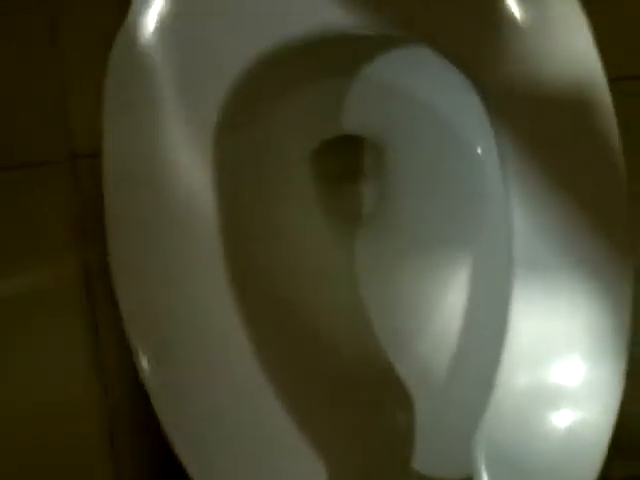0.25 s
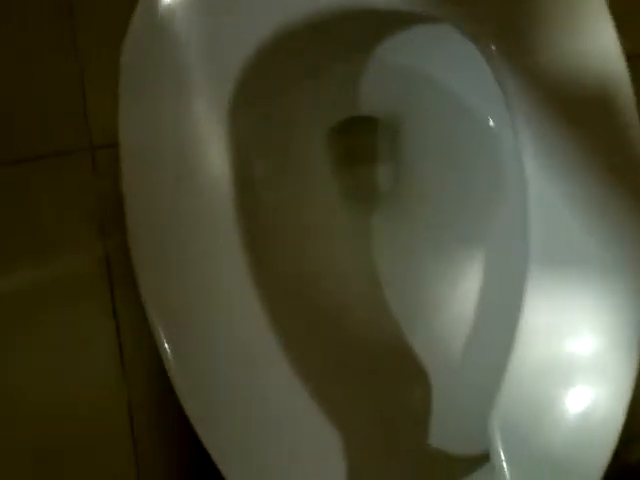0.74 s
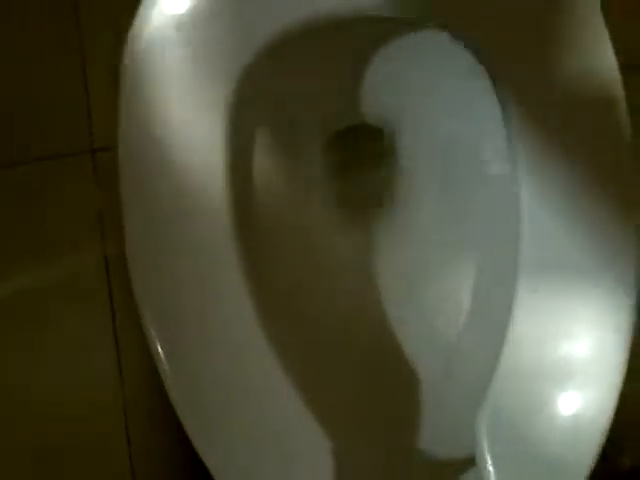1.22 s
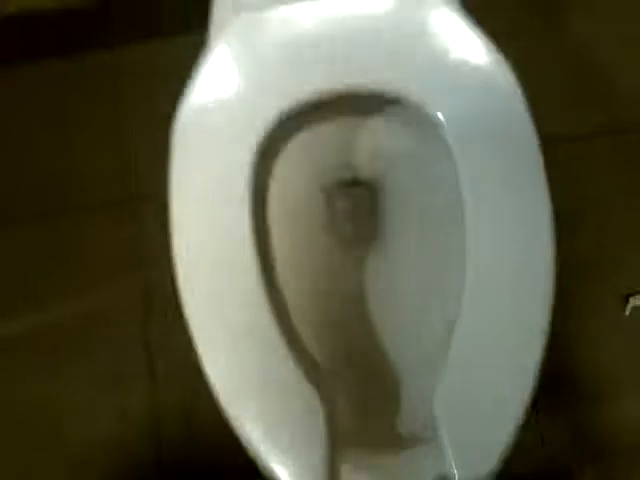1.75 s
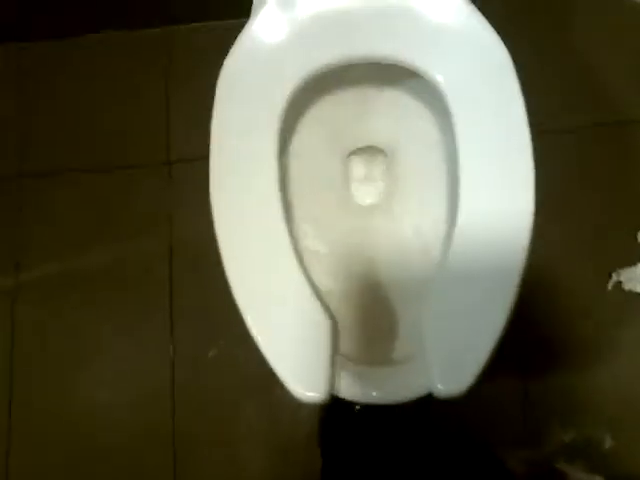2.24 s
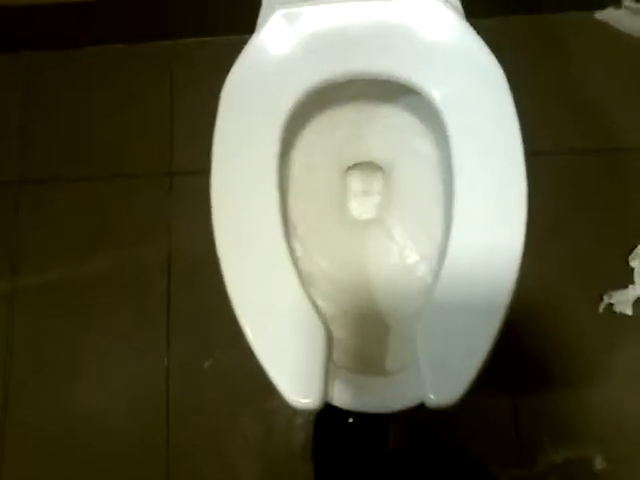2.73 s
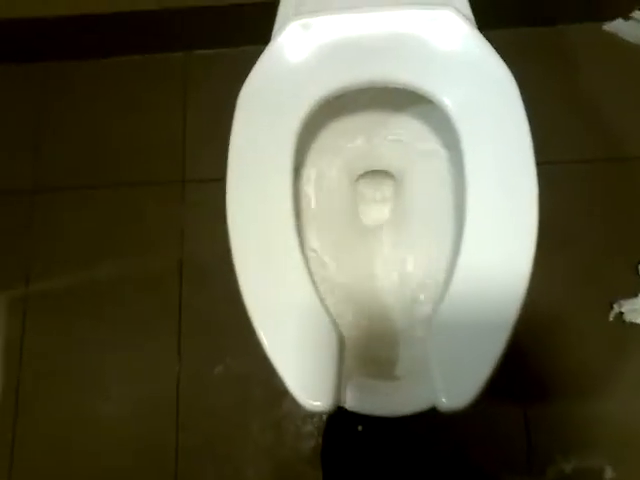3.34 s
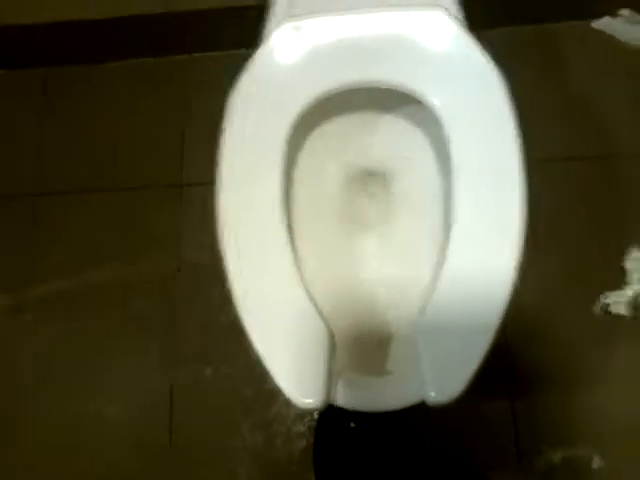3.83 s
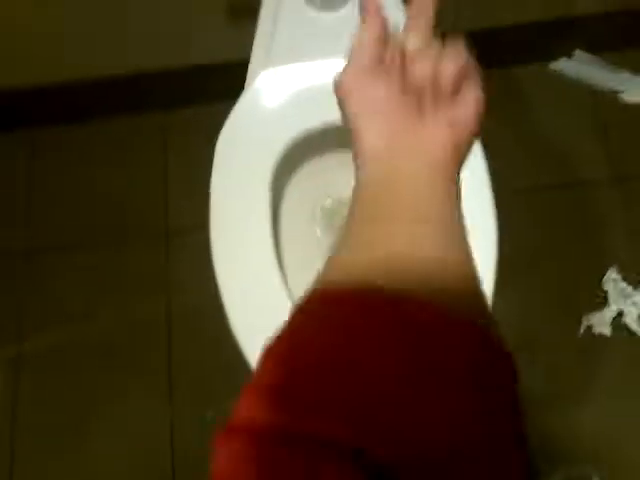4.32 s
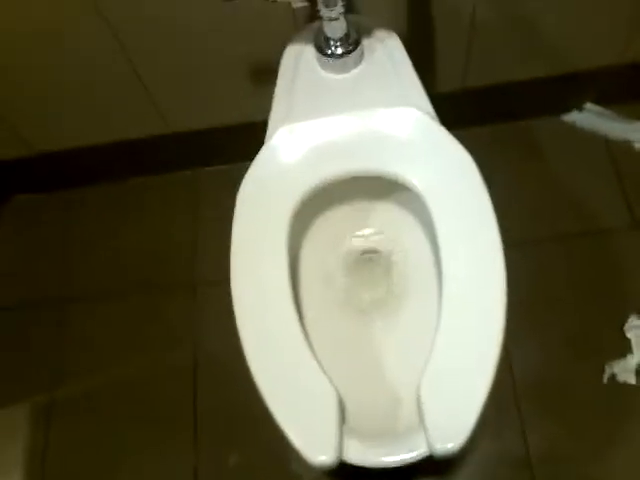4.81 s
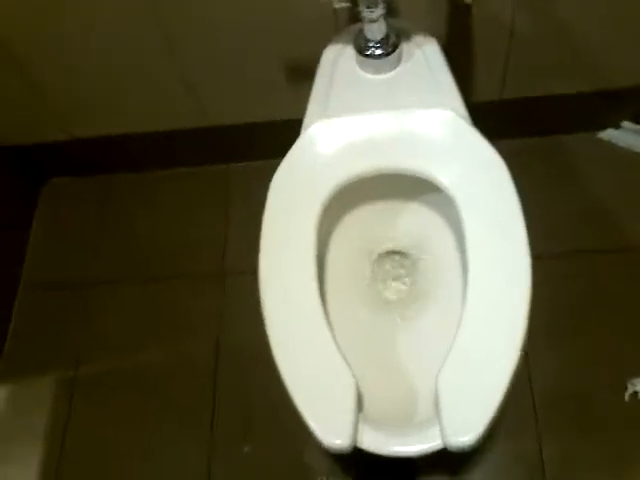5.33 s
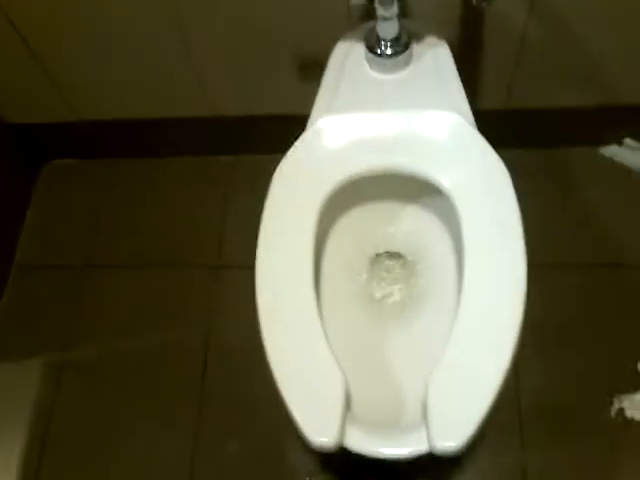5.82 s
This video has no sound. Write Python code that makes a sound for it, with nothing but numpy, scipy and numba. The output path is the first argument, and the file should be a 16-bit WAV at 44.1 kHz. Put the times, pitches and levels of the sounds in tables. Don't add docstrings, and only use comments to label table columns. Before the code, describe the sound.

In a tiled restroom with low ventilation rumble and mains hum, a lever clicks twice. The supply pipe shudders with rapid hammering and faint whistling as jets burst into the bowl. The hammering cuts off, air slurps down the trap with rising bubbles, and bright water rushes steadily. The jets fail into crackling droplets, then scattered drips and a weak gurgle. One small close microphone, short hard reverberation.

```python
import sys
import numpy as np
from scipy import signal
from scipy.fft import rfft, irfft, next_fast_len
from scipy.io import wavfile
from scipy.ndimage import uniform_filter1d, map_coordinates
from numba import njit

SR = 44100
rng = np.random.default_rng(int(sys.argv[2]) if len(sys.argv) > 2 else 0)


def attenuation_scalar(level_db):
    decades = np.asarray(level_db, float) / 20
    return 10 ** decades


def master(y):
    cut = np.clip(np.atleast_2d(y).T, -1, 1)
    pcm = np.round(cut * 32767)
    wavfile.write(sys.argv[1], SR, pcm.astype(np.int16))


N = 267246
T_S = np.arange(N) / SR

# freq_hz, level_db
VENT = [(12, -39), (20, 5), (43, 4), (80, -6), (141, 0), (205, -4.5), (346, -10), (538, -23.5), (3000, -37),
        (3900, -63), (6600, -120)]
# centre_hz, width_hz, level_db
ROOM_MODES = [(111.5, 7.4, 5), (143.8, 7.6, 8.5), (181, 5.2, -12), (262.3, 17.4, -2.5), (361.4, 6.6, -0.5),
              (443, 35, -12)]
MAINS_HZ, MAINS_DB = 59.5, 1
RUMBLE_DB, BOOM_DB, SHAKES_DB = -49.5, -43, -39.5
DUCK_AT_S, DUCK_IN_S, DUCK_UNTIL_S, DUCK_OUT_S, DUCK_DB = 1, 0.38, 3.28, 0.91, -7.5
# freq_hz, t60_s
TILES = [(200, .6), (2000, 0.35), (6000, .45), (14000, 0.3)]
SELF_NOISE_DB, TOP_HZ, CEILING = -66, 15750, .66
# middle_s, side_db, low_hz, high_hz
SIDE_BANDS = [
    (.557, -27, 5900, 8000),
    (.557, -36, 8700, 12000),
    (1.14, -24, 4600, 6500),
    (2.046, -50, 13600, 15700),
    (2.441, -26, 5500, 7100),
    (3.113, -32, 7500, 9800),
]
SIDE_BAND_S = .046

# start_s, peak_db, contact_s
TAPS = [
    (4.511, -40, .00005),
    (4.646, -42, .00004),
    (5.332, -40, .00016),
    (5.6972, -30, .00009),
]
# start_s, peak_db, lowest_hz, t60_s, capsule_dullness (0-1)
HANDLE = [
    (.109, -25, 2600, .025, .7),
    (.143, -12, 4700, .03, .9),
]
# start_s, peak_db, pitch_hz, t60_s
STEEL = [
    (0.109, -15.5, 3060, 0.0036),
    (.11, -23, 6860, 0.014),
    (.11, -40, 10100, 0.0088),
    (.143, -28, 4950, 0.05),
    (.144, -25, 7580, 0.024),
    (.143, -52, 5610, 0.015),
]
# start_s, peak_db, capsule_dullness (1 = full)
SPATTERS = [(1.38, -11, .8), (1.4067, -8, 1.0), (2.7482, -9, 1.1), (2.9018, -11, 1.1), (2.9307, -11, 1.1),
            (3.5104, -31, .9), (3.5524, -24, 1.3), (3.6346, -21, 1.1), (3.6774, -30, 1.3), (3.754, -21, .8),
            (3.769, -19, 1.1), (3.8462, -31, .8), (3.9044, -39, .4), (3.9564, -40, .5), (4.0282, -30, 1.05),
            (4.0517, -26, .9), (4.062, -29, .8), (4.5242, -34, 1.6), (4.6944, -38, .9), (4.8254, -47, .7),
            (5.0497, -35, .9), (5.1374, -39, .9)]
SPATTER_HZ, SPATTER_T60_S = 4500, 0.07
# freq_hz, level_db
CAPSULE = [(180, -35), (300, -5), (405, -13), (667, -9), (1250, -15), (1360, -13), (2100, 8), (2980, 11),
           (6740, 16), (16000, -21)]
# start_s, peak_db, pitch_hz, t60_s
DRIPS = [(3.492, -16, 4500, 0.0089), (3.565, -30, 5000, 0.017), (3.575, -23, 3350, 0.017),
         (3.62, -17, 6500, 0.025), (3.646, -18, 5370, 0.011), (3.678, -20.5, 4200, 0.02),
         (3.745, -12.5, 2880, 0.0051), (3.76, -18, 2700, 0.0067), (3.819, -20, 2470, 0.014),
         (3.881, -23, 3800, 0.021), (4.03, -17, 3700, 0.0076), (4.056, -19, 3040, 0.015),
         (4.06, -24, 4200, .01), (4.07, -21.5, 2610, 0.016), (4.084, -20, 6850, .015),
         (4.512, -23, 2200, 0.0058), (4.646, -31, 3300, .006), (4.649, -23.5, 2980, 0.014),
         (5.137, -33, 3520, .006), (5.139, -25, 4080, 0.024), (5.1414, -20, 5330, 0.021),
         (5.275, -32, 3470, 0.018), (5.339, -28, 4260, 0.024), (5.455, -28, 7460, 0.011),
         (5.53, -24, 5500, 0.014), (5.533, -25, 5200, 0.02), (5.615, -28, 3750, 0.0075),
         (5.676, -29, 6500, 0.02), (5.952, -37, 5000, 0.01)]
# start_s, peak_db, pitch_hz, t60_s
GULPS = [(0.112, -26.5, 996, 0.036), (0.114, -27.5, 212, 0.29), (0.142, -18.5, 154, 0.064),
         (.195, -22, 126, 0.06), (.245, -24, 120, 0.079), (1.269, -11, 3334, 0.022),
         (4.204, -41, 1800, .15), (4.39, -48, 1966, 0.26), (2.905, -10, 3600, 0.023),
         (2.995, -12, 4100, 0.022), (1.925, -12, 2570, 0.034), (1.931, -12.5, 1530, 0.043),
         (3.237, -20, 1130, 0.028), (3.426, -20, 1490, 0.023), (3.429, -29.5, 273, 0.12),
         (3.585, -25.5, 270, 0.078), (3.626, -30, 990, 0.055), (3.655, -28.5, 980, 0.054),
         (3.733, -31, 590, 0.091), (5.334, -39, 900, .04), (5.345, -38, 597, .08), (.33, -29, 227, 0.14),
         (.42, -29, 235, 0.097), (4.476, -36, 458, 0.15), (4.51, -34, 470, .06), (4.53, -35, 420, 0.17),
         (4.589, -38, 440, 0.19), (5.698, -25, 272, 0.061)]

# time_s, roar_db
ROAR = [
    (.27, -52),
    (.302, -28),
    (.456, -24.5),
    (.49, -12.5),
    (.62, -12.5),
    (.9, -9),
    (1.05, -17),
    (1.22, -14.5),
    (1.355, -7),
]
FILLS_DB_PER_S = 600
# centre_hz, width_hz, level_db
PIPE = [(211, 36, -7.5), (253, 31, -4.5), (287.5, 40, -3), (373, 25, -2.5), (411, 33, -5), (573, 34, -12),
        (646, 15, -7), (742, 59, -12)]
# pitch_hz, level_db, drowned_s
VALVE = [(1710, -9, 1.3), (1990, -12, 1.02)]
# time_s, level_db
WHISTLE = [
    (.47, -64),
    (.85, -40),
    (.96, -19),
    (1.1, -39),
    (1.25, -22),
    (1.38, -53),
]
# peak_s, peak_db, pitch_hz
KNOCKS = [(.3, -31, 330), (.36, -32, 333.4), (.41, -31.5, 329.7), (.445, -32.5, 329.3),
          (0.491, -15.5, 330.3), (0.52, -12, 330.5), (.545, -15, 331), (.569, -11, 327.6),
          (.604, -8, 343.6), (.63, -9.5, 338), (.656, -7.5, 336), (.697, -15, 317.7), (.73, -20, 331.3),
          (.755, -16, 328), (0.788, -14.5, 337.6), (.83, -16, 331.6), (.85, -14.5, 334), (.875, -17, 332),
          (.907, -14.5, 323.8), (.934, -16, 338.7), (.952, -17, 339), (.984, -17.5, 353.2),
          (1.01, -24, 336), (1.052, -19, 336.3), (1.09, -27, 330.4), (1.139, -14.5, 327.2),
          (1.168, -19.5, 322), (1.2, -10.5, 317.4), (1.222, -19, 329.5), (1.247, -9.5, 339),
          (1.29, -16, 318.6), (1.308, -13.5, 323), (1.346, -14.5, 335)]
KNOCK_DB, KNOCK_RISE_S, KNOCK_T60_S, BETWEEN_DB = -14, .012, .1, -11
# peak_s, peak_db, pitch_hz
LOW_KNOCKS = [(0.525, -27, 244.6), (0.551, -23.5, 238.4), (0.644, -27, 235.5), (0.679, -19.6, 241),
              (0.709, -20, 238), (0.74, -30, 229), (0.768, -13.5, 223), (0.842, -24, 232.7),
              (0.879, -23.1, 243.4), (0.906, -24.0, 245.6), (0.984, -25, 236.1), (1.061, -27.8, 235.2),
              (1.086, -24, 228), (1.11, -22.5, 231.7), (1.16, -21, 243.8), (1.255, -25, 239.4),
              (1.29, -22, 249), (1.365, -19, 248)]
# peak_s, peak_db, pitch_hz
SINGS = [(0.586, -28.5, 1375), (0.668, -36.2, 1387), (0.806, -36, 1382), (0.881, -40, 1372),
         (0.957, -32, 1382), (1.027, -31.7, 1367), (1.087, -33, 1388), (1.137, -33, 1382),
         (1.208, -28, 1380), (1.391, -34, 1370)]
# peak_s, peak_db, pitch_hz
SINGS_HIGH = [(0.542, -32, 3343), (0.67, -31, 3290), (0.707, -35.3, 3270), (0.77, -40, 3364),
              (0.811, -35.3, 3310), (0.925, -40, 3290)]
# centre_hz, width_hz, level_db
SEAT = [(1997, 22, -1), (2300, 69, -1.5), (2640, 67, -21), (3190, 64, -2), (3910, 230, -2), (4530, 44, 1),
        (4960, 170, -16)]
SEAT_S, SEAT_DB, SEAT_RISE_S, SEAT_T60_S = 0.51, -33.5, 0.032, 7.4
# (centre_hz, width_hz, level_db), then time and level
LEAK, LEAK_S, LEAK_DB = (10500, 1200, 0), 0.23, -50
# centre_hz, width_hz, level_db
NOZZLE = [(5930, 1300, 0), (6200, 1700, 0), (5190, 410, 0), (7600, 1400, 0)]
NOZZLE_S, NOZZLE_DB = (0.74, 0.98, 1.05, 1.18), (-20.5, -21, -25, -28)
NOZZLE_RISE_S, NOZZLE_T60_S = 0.12, 2.4

# time_s, churn_db, froth_fineness_db
BOWL = [(.1, -58, -2), (.13, -40.5, -6), (.28, -51, -23), (.37, -44.5, -8), (.49, -34, -6),
        (.57, -27.5, -44), (.74, -30, -8), (.85, -27, -1.5), (1.0, -25, 0), (1.2, -30, 2.5),
        (1.4, -24, 0.5), (1.6, -32.5, 9.5), (1.95, -36.5, 8.5), (2.12, -33, 0), (2.5, -33.5, 0.5),
        (2.75, -30.5, -3), (3.0, -38, 4.5), (3.85, -47.5, 7), (4.9, -53.5, -4), (6.06, -57.5, -1)]
# centre_hz, width_hz, level_db
TRAP = [(206, 20, -7), (236, 72, -10), (273, 17.3, -2), (354.5, 34, -11)]
# centre_hz, width_hz, level_db
CHINA = [(965.4, 12, 3), (1013, 33, 3.5), (1480, 5.5, -37), (1800, 20, -7), (2636, 29, -10)]
# freq_hz, level_db
CHURN = [(250, -32), (420, -4.5), (668, 2.5), (895, -3), (980, 1), (1230, -9), (1500, -7.5), (1950, -89),
         (3300, -120)]
# freq_hz, level_db
FIZZ = [(740, -8), (1250, -1.5), (1480, 0), (1720, -1.5), (2400, -2), (3120, -10.5), (5280, -120)]
# peak_s, peak_db
SWALLOWS = [
    (1.54, -18.5),
    (1.94, -28.5),
    (2.23, -27.5),
    (2.43, -49),
    (2.62, -32),
    (2.84, -41),
    (3.59, -42),
    (5.37, -35),
    (5.72, -41),
]
SWALLOW_RISE_S, SWALLOW_T60_S = 0.096, 0.68
TRAP_DB, STIRS_DB = 0.5, -25.5
# peak_s, peak_db
SURGES = [(.37, -43), (.55, -41), (.72, -28.5), (1.01, -29.5), (1.28, -26), (1.5, -53), (1.7, -35),
          (1.94, -34), (2.33, -39), (3.22, -38.5)]
SURGE_RISE_S, SURGE_T60_S, CHINA_DB = 0.097, 0.28, -15
# start_s, peak_db, pitch_hz, t60_s
SUCKS = [(1.385, -8, 1320, 0.034), (1.415, -5.5, 1470, 0.034), (1.43, -8, 970, 0.031),
         (1.452, -6, 1520, 0.03), (1.487, -13, 1510, 0.028), (1.535, -7, 2640, 0.037),
         (1.553, -8, 2560, 0.022), (1.568, -7, 2950, 0.017), (1.55, -8, 1800, .03),
         (1.61, -11, 2330, 0.028), (1.61, -12.5, 964, 0.024), (1.68, -10, 2150, 0.023),
         (1.722, -5, 2670, .02), (1.76, -8, 2760, 0.017), (1.826, -4, 4700, .015)]
# peak_s, peak_db, pitch_hz
GLUGS = [(1.448, -25, 300), (1.492, -29.5, 251.5), (1.565, -25, 261.8), (1.673, -29.5, 258.2),
         (1.74, -38, 290), (1.765, -31.2, 278), (1.826, -27, 270.4), (1.86, -30.8, 278), (1.947, -31, 283),
         (2.049, -29, 265), (2.133, -27.5, 284.5), (2.186, -32, 277), (2.232, -32, 270.3),
         (2.266, -36, 259.6), (2.344, -30, 283.7), (2.439, -29.4, 269.7), (2.498, -32, 268),
         (2.562, -39, 255), (2.616, -24, 273), (2.736, -37, 270), (2.843, -22.5, 277), (2.921, -32.8, 265)]
# peak_s, peak_db, pitch_hz
RINGS = [(0.556, -18.5, 1024), (0.607, -27, 1005), (0.708, -15, 1013), (0.757, -20, 1009),
         (0.855, -29.9, 1020), (0.898, -21, 1013), (1.01, -19, 1017), (1.113, -26.9, 1014),
         (1.162, -27, 1018), (1.205, -20.5, 1021), (1.253, -35, 1024), (1.295, -32, 1018),
         (1.387, -31, 1033), (1.434, -28, 1026), (1.479, -32.0, 1017), (1.506, -30.7, 1019),
         (1.618, -21, 975), (1.703, -36, 1001), (1.735, -35, 976)]
# peak_s, peak_db, pitch_hz
LAST_RINGS = [(4.218, -43, 1046), (4.26, -41, 1007), (4.299, -43, 1021), (4.36, -42, 1015),
              (4.41, -44, 1020), (4.451, -47, 1003), (4.482, -53, 998)]

# time_s, flow_db, air_over_flow_db
FLOW = [(0, -53.5, -45), (.13, -52, -5), (.27, -39.5, -7), (.46, -36.5, -14.5), (.53, -23.5, -12),
        (.72, -25.5, -7.5), (1.2, -20, -24), (1.49, -19.5, -16), (2.0, -20, -16.5), (2.35, -18.5, -16),
        (2.7, -17.5, -17), (2.95, -18.5, -17.5), (3.3, -25, -24), (3.55, -37, -24), (3.8, -39, -18),
        (4.05, -46.5, -54), (5.55, -51.5, -13), (5.75, -59.5, -14), (6.06, -56.5, -27)]
# freq_hz, level_db
SPLASH = [(1350, -22), (2350, -7.5), (2620, -4.5), (3010, -1.5), (3410, -2.5), (4500, -2), (5850, -2),
          (9900, -120)]
# freq_hz, level_db
SPRAY = [(2530, -21.5), (4300, -6), (5280, -3.5), (6040, 1), (6990, 3.5), (10500, -20), (13600, -50),
         (22000, -120)]
# freq_hz, level_db
MIST = [(5590, -8), (9500, -4.5), (12200, -13.5), (15200, -17.5), (16000, -26)]
SHEET_DB, SHEET_FOLLOWS = -7, 0.25
FLOW_HIGH_PASS_HZ = 146


def unit(x):
    return x / np.sqrt(np.mean(x ** 2) + 1e-20)


def along(points, hz):
    f, v = np.transpose(points)
    return np.interp(np.log(hz + 1), np.log(f + 1), v)


def curves(rows):
    s, *cols = np.transpose(rows)
    return [np.interp(T_S, s, c) for c in cols]


def wobble(rate_hz):
    knots = rng.standard_normal(int(N * rate_hz / SR) + 4)
    return map_coordinates(knots, [np.arange(N) * rate_hz / SR])


def swells(events, rise_s, t60_s):
    late_s = T_S - np.array(events)[:, :1]
    rise = np.clip(1 + late_s / rise_s, 0, 1) ** 2
    decay = attenuation_scalar(-60 * np.abs(late_s) / t60_s)
    return attenuation_scalar(np.array(events)[:, 1]) @ np.where(late_s < 0, rise, decay)


def filtered(x, response):
    m = next_fast_len(N + SR // 2)
    return irfft(rfft(x, m) * response(np.fft.rfftfreq(m, 1 / SR)), m)[:N]


def resonant(modes):
    def response(f):
        total = 0
        for k, (centre_hz, width_hz, db) in enumerate(modes):
            damping = 1j * f * width_hz
            total = total + (-1) ** k * attenuation_scalar(db) * damping / (centre_hz ** 2 - f * f + damping)
        return total
    return response


def patchy(depth_db):
    z = signal.stft(rng.standard_normal(N), nperseg=512)[2]
    field = uniform_filter1d(rng.standard_normal(z.shape), size=6, axis=0)
    field = uniform_filter1d(field, size=10, axis=1)
    return unit(signal.istft(z * attenuation_scalar(depth_db * unit(field)), nperseg=512)[1][:N])


@njit
def bubbles(n, sr, rows, rise, soft):
    out = np.zeros(n + sr)
    for s, size, hz, t60 in rows:
        for i in range(int(min(t60, .5) * sr)):
            u = i / sr / t60
            envelope = np.exp(-6.9 * u) * (1 - np.exp(-u / soft))
            out[int(s * sr) + i] += size * envelope * np.sin(2 * np.pi * hz * i / sr * (1 + rise * u))
    return out[:n]


def blips(table, rise, soft):
    rows = np.array(table, float)
    rows[:, 1] = attenuation_scalar(rows[:, 1])
    return bubbles(N, SR, rows, rise, soft)


def scattered(start_s, end_s, count, from_hz, to_hz, cycles, from_db, to_db, spread=0.255):
    u, z = rng.random(count), rng.standard_normal((count, 2))
    hz = from_hz * (to_hz / from_hz) ** u * np.exp(spread * z[:, 0])
    size = attenuation_scalar(from_db + (to_db - from_db) * u + 1.1 * np.clip(z[:, 1], -2, 2))
    rows = np.column_stack([start_s + (end_s - start_s) * u, size, hz, cycles / hz])
    return bubbles(N, SR, rows, 0.17, 0.017)


def water(spectrum, count, centre_hz, cycles, spread_db, share, patchy_db):
    when, z = rng.random(count), rng.standard_normal((count, 2))
    hz = np.clip(centre_hz * np.exp(0.401 * z[:, 0]), 100, SR / 3)
    size = attenuation_scalar(spread_db * np.clip(z[:, 1], -2, 2))
    rows = np.column_stack([when * N / SR, size, hz, cycles / hz])
    colour = lambda f: attenuation_scalar(along(spectrum, f))
    swarm = unit(filtered(bubbles(N, SR, rows, 0.25, 0.13), colour))
    rush = unit(filtered(patchy(patchy_db), colour))
    return np.sqrt(share) * swarm + np.sqrt(1 - share) * rush


def throbs(rows, width_s, db, waver):
    s, peak_db, hz = np.transpose(rows)
    power = sum(attenuation_scalar(2 * p) * np.exp(-((T_S - c) / width_s) ** 2) for c, p in zip(s, peak_db))
    pitch_hz = np.interp(T_S, s, hz) * (1 + waver * wobble(39.73))
    return attenuation_scalar(db) * np.sqrt(power) * np.sin(2 * np.pi * np.cumsum(pitch_hz) / SR)


def roar():
    full_s = np.clip(T_S - ROAR[-1][0], 0, 1)
    return attenuation_scalar(curves(ROAR)[0] - FILLS_DB_PER_S * full_s) * (T_S > ROAR[0][0])


def room_tone():
    into, out_of = (T_S - DUCK_AT_S) / DUCK_IN_S, 1 - (T_S - DUCK_UNTIL_S) / DUCK_OUT_S
    duck = attenuation_scalar(DUCK_DB * np.clip(np.minimum(into, out_of), 0, 1))
    modes = unit(filtered(filtered(patchy(0.91), resonant(ROOM_MODES)), lambda f: f > 90))
    duct = unit(filtered(patchy(0.66), lambda f: attenuation_scalar(along(VENT, f))))
    hum = attenuation_scalar(MAINS_DB + 1.3 * wobble(3.0)) * np.sin(2 * np.pi * MAINS_HZ * T_S)
    rumble = attenuation_scalar(RUMBLE_DB + 0.64 * wobble(2.76)) * (attenuation_scalar(1.5) * duct + hum)
    boom = attenuation_scalar(BOOM_DB + 1.2 * wobble(3.78)) + attenuation_scalar(SHAKES_DB) * roar()
    return duck * (rumble + boom * modes)


def side_bands():
    out = np.zeros(N)
    for s, db, low_hz, high_hz in SIDE_BANDS:
        band = unit(filtered(rng.standard_normal(N), lambda f: (f > low_hz) & (f < high_hz)))
        window = np.cos(np.pi * np.clip((T_S - s) / SIDE_BAND_S, -.5, .5)) ** 2
        out += attenuation_scalar(db) * window * band
    return out


def tiles(x, size):
    out = np.zeros(2 * N + SR)
    for start in range(0, N, size):
        hz, t, z = signal.stft(rng.standard_normal(SR // 2), SR, nperseg=256)
        tail = signal.istft(z * attenuation_scalar(-60 * t / along(TILES, hz)[:, None]), SR, nperseg=256)[1]
        wet = signal.fftconvolve(x[start:start + size], tail / np.linalg.norm(tail))
        out[start + 150:][:len(wet)] += wet
    return out[:N]


def taps():
    out = np.zeros(N + SR)
    for s, db, contact_s in TAPS:
        u = np.arange(400) / SR / contact_s
        out[round(s * SR):][:len(u)] += attenuation_scalar(db) * 2 * u ** 2 * (3 - u) * np.exp(-u)
    return out[:N]


def handle():
    squeak = scattered(.062, .106, count=24, from_hz=6450, to_hz=6700, cycles=45,
                       from_db=-47, to_db=-41, spread=.03)
    return squeak + blips(STEEL, 0., 0.023)


def clicks():
    out, t = np.zeros(N + SR), np.arange(SR // 8) / SR
    hz = np.fft.rfftfreq(len(t), 1 / SR)
    spatters = [(s, db, SPATTER_HZ, SPATTER_T60_S, dull) for s, db, dull in SPATTERS]
    for s, db, low_hz, t60_s, dull in list(HANDLE) + spatters:
        colour = attenuation_scalar(np.clip(dull, 0, 2) * along(CAPSULE, hz)) / (1 + (low_hz / (hz + 1)) ** 6)
        crack = unit(irfft(rfft(rng.standard_normal(len(t))) * colour, len(t)))
        envelope = attenuation_scalar(db - 8.0 - 60 * t / t60_s) * (1 - np.exp(-t / 0.00017))
        out[round(s * SR):][:len(t)] += envelope * crack
    return out[:N]


def drips():
    small = np.array(DRIPS, float)
    small[:, 1] = attenuation_scalar(small[:, 1] - 4.5)
    thrown = np.repeat(small, repeats=9, axis=0)
    late, z = rng.random(len(thrown)), rng.standard_normal(len(thrown))
    thrown[:, 0] += 0.045 * late
    thrown[:, 1] *= attenuation_scalar(-5.5 - 16 * late)
    thrown[:, 2] *= np.exp(.075 * z)
    drops = bubbles(N, SR, np.vstack([small, thrown]), 0.12, 0.04)
    return drops + attenuation_scalar(-4.0) * blips(GULPS, 0.036, 0.0067)


def standing_waves():
    pipe_notes = throbs(KNOCKS, 0.0096, -0.6, 0.014) + throbs(LOW_KNOCKS, .012, -2.3, 0.014)
    trap = throbs(GLUGS, 0.019, -2.9, 0.0152)
    china = throbs(RINGS, 0.013, -5.5, .005) + throbs(LAST_RINGS, 0.01, -2.2, .004)
    seat = throbs(SINGS, 0.024, 1.5, 0.0044) + throbs(SINGS_HIGH, 0.024, 0.0, 0.0036)
    return pipe_notes + trap + china + seat


def pipe():
    low = filtered(patchy(1.5) * attenuation_scalar(.5 * wobble(23.3)), resonant(PIPE))
    low = low / np.sqrt(np.abs(uniform_filter1d(low ** 2, size=900)) + .1 * np.mean(low ** 2))
    slams = swells(np.array(KNOCKS)[:, :2], KNOCK_RISE_S, KNOCK_T60_S)
    hammer = attenuation_scalar(BETWEEN_DB) * roar() + attenuation_scalar(KNOCK_DB) * slams
    high = np.zeros(N)
    for hz, db, drowned_s in VALVE:
        phase = 2 * np.pi * np.cumsum(hz * (1 + 0.009 * wobble(45.6))) / SR
        level_db = db + 4 * wobble(35) - 60 * np.clip(T_S - drowned_s, 0, 1)
        high += attenuation_scalar(level_db) * np.sin(phase)
    whistle = attenuation_scalar(curves(WHISTLE)[0]) * high * (T_S > WHISTLE[0][0])
    return hammer * unit(low) + whistle


def air_in_the_valve():
    seat = unit(filtered(patchy(2.0), resonant(SEAT)))
    out = swells([(SEAT_S, SEAT_DB)], SEAT_RISE_S, SEAT_T60_S) * seat
    leak = unit(filtered(patchy(2.2), lambda f: resonant([LEAK])(f) ** 2))
    out += swells([(LEAK_S, LEAK_DB)], .15, 1.0) * leak
    for s, db, hole in zip(NOZZLE_S, NOZZLE_DB, NOZZLE):
        band = resonant([hole])
        song = unit(filtered(patchy(2.5), lambda f: band(f) ** 2))
        out += swells([(s, db)], NOZZLE_RISE_S, NOZZLE_T60_S) * song
    return out


def slurp_and_crackle():
    slurp = scattered(1.38, 1.68, count=110, from_hz=1270, to_hz=2800, cycles=31, from_db=-23, to_db=-28)
    sucks = attenuation_scalar(-2.5) * blips(SUCKS, 0.14, 0.05)
    crackle = scattered(3.2, 4.3, count=110, from_hz=5700, to_hz=5960, cycles=27, from_db=-16.5, to_db=-36)
    return slurp + sucks + crackle


def bowl():
    churn_db, fine_db = curves(BOWL)
    swallow = swells(SWALLOWS, SWALLOW_RISE_S, SWALLOW_T60_S)
    churn = attenuation_scalar(churn_db) + attenuation_scalar(STIRS_DB) * swallow
    gulp, fizz = attenuation_scalar(churn_db + TRAP_DB) + swallow, churn * attenuation_scalar(fine_db)
    cleared = np.clip((T_S - 1.38) / 0.15, 0, 1)
    trap = filtered(patchy(1.05) * attenuation_scalar(2.5 * wobble(23)), resonant(TRAP))
    trap = unit(filtered(trap, lambda f: f > 170))
    mids = water(CHURN, count=900, centre_hz=850.6, cycles=28.0, spread_db=0.0, share=0.32, patchy_db=-0.5)
    mids = churn * attenuation_scalar(0.28 * wobble(5.1) - 2.5) * mids
    highs = water(FIZZ, count=2000, centre_hz=1771, cycles=24.4, spread_db=-6.5, share=0.17, patchy_db=2.5)
    highs = fizz * attenuation_scalar(0.25 * wobble(16) - 1.6) * highs
    struck = swells(SURGES, SURGE_RISE_S, SURGE_T60_S) + attenuation_scalar(churn_db + CHINA_DB)
    ring = struck * unit(filtered(patchy(1.0), resonant(CHINA)))
    return cleared * gulp * trap * attenuation_scalar(-3.5) + mids + highs + ring


def jets():
    flow_db, air_db = curves(FLOW)
    spray, mist = attenuation_scalar(flow_db), attenuation_scalar(flow_db + air_db)
    splash = spray * attenuation_scalar(SHEET_DB + SHEET_FOLLOWS * curves(BOWL)[1])
    surge = wobble(17)
    sheet = water(SPLASH, count=5000, centre_hz=3344, cycles=43, spread_db=2.5, share=0.45, patchy_db=1.5)
    drops = water(SPRAY, count=12000, centre_hz=6500, cycles=17.2, spread_db=6.5, share=0.31, patchy_db=2.0)
    fine = water(MIST, count=20000, centre_hz=12920, cycles=51, spread_db=7.0, share=0.16, patchy_db=-1.5)
    sheet = splash * attenuation_scalar(0.087 * surge + 0.33 * wobble(14) - 0.23) * sheet
    drops = spray * attenuation_scalar(0.25 * surge + 0.67 * wobble(40) - 0.15) * drops
    return sheet + drops + mist * attenuation_scalar(1.0 * surge + 4.5) * fine


def scene():
    small = clicks() + handle() + drips()
    flow = pipe() + air_in_the_valve() + bowl() + jets() + slurp_and_crackle()
    flow = filtered(flow, lambda f: (1j * f / (FLOW_HIGH_PASS_HZ + 1j * f)) ** 3)
    wet = attenuation_scalar(-3) * tiles(small, size=SR // 3) + attenuation_scalar(-8.5) * tiles(flow, size=SR // 2)
    mono = attenuation_scalar(-0.93) * flow + small + wet + room_tone() + taps() + standing_waves()
    return np.array([mono, mono])


def band_limit(x):
    return signal.sosfilt(signal.butter(12, 16160, fs=SR, output="sos"), x)


def record(dry):
    mono = dry[0] + attenuation_scalar(SELF_NOISE_DB + 1.0) * rng.standard_normal(N)
    mono = mono / (1 + np.abs(mono / CEILING) ** 5) ** (1 / 5)
    mono = filtered(mono, lambda f: f < TOP_HZ)
    side = side_bands()
    return band_limit(np.array([mono + side, mono - side]))


dry = scene()
out = record(dry)
master(out)
```